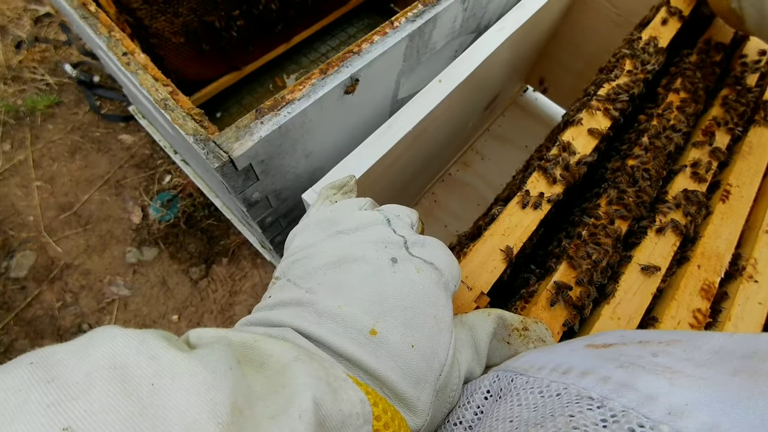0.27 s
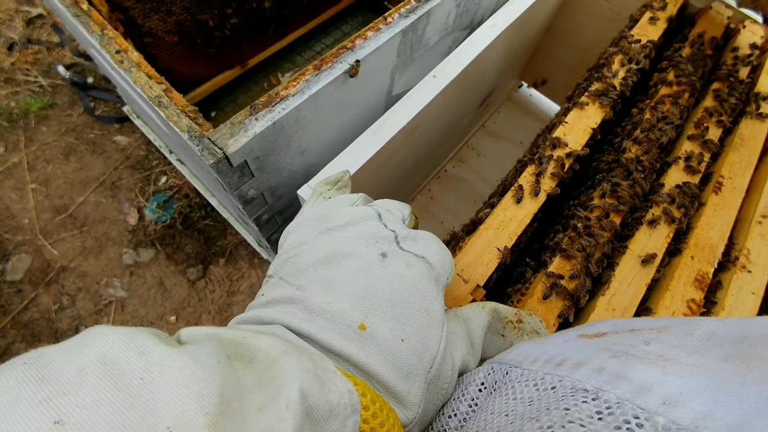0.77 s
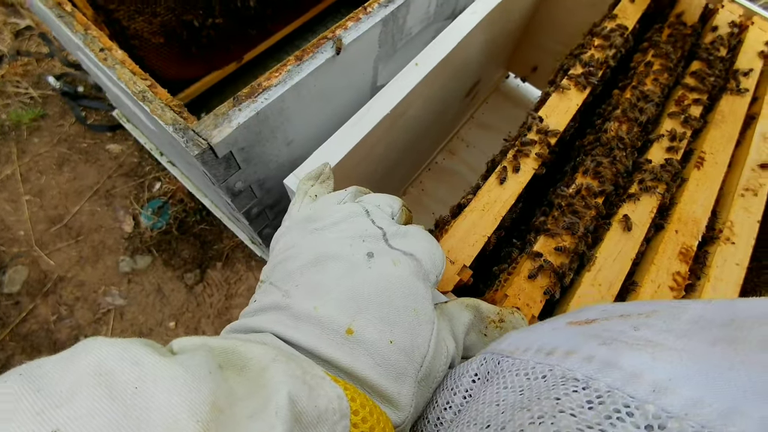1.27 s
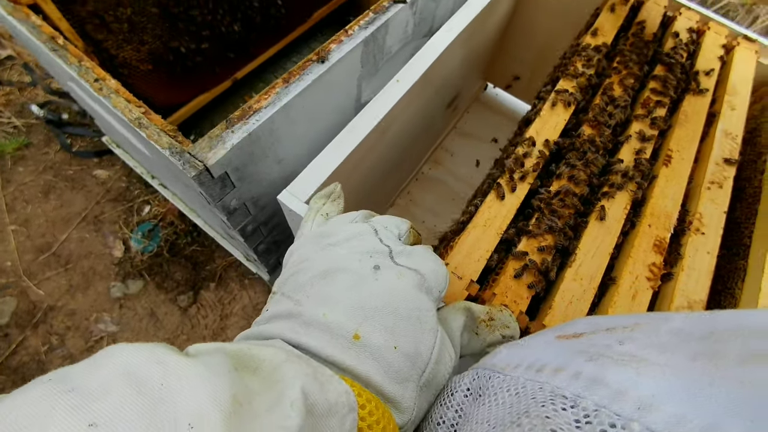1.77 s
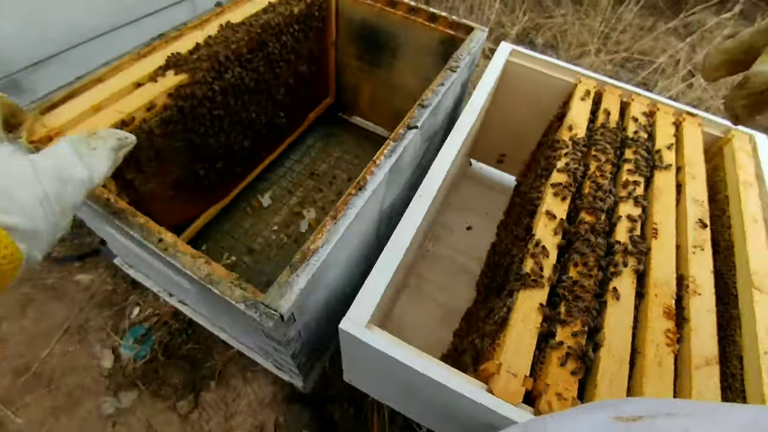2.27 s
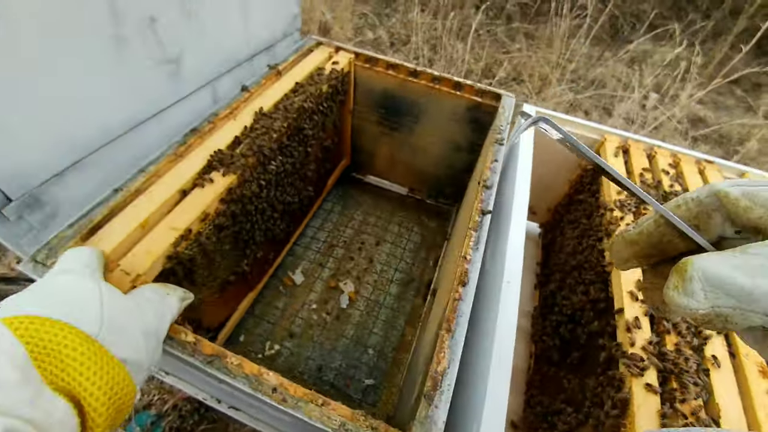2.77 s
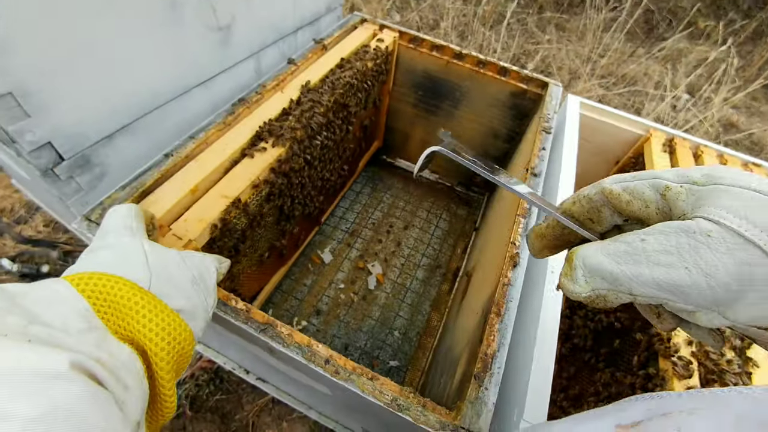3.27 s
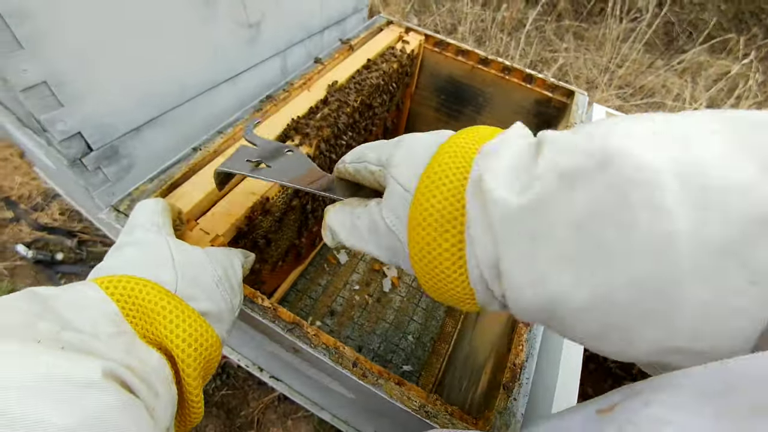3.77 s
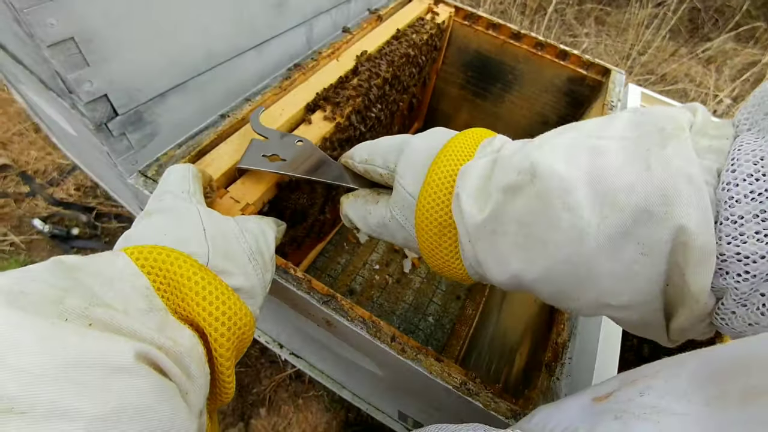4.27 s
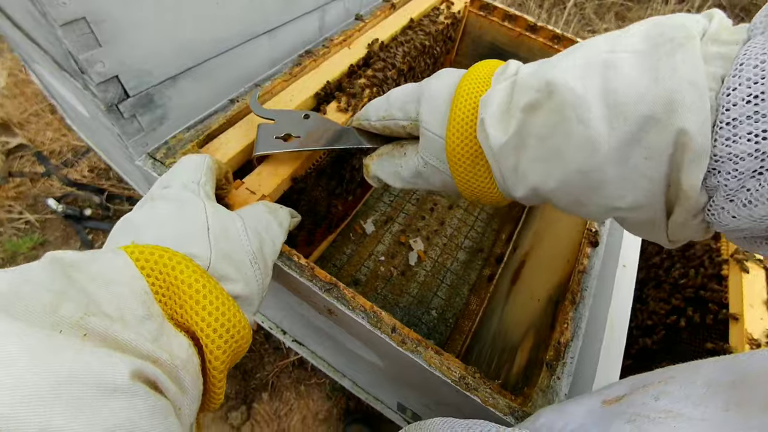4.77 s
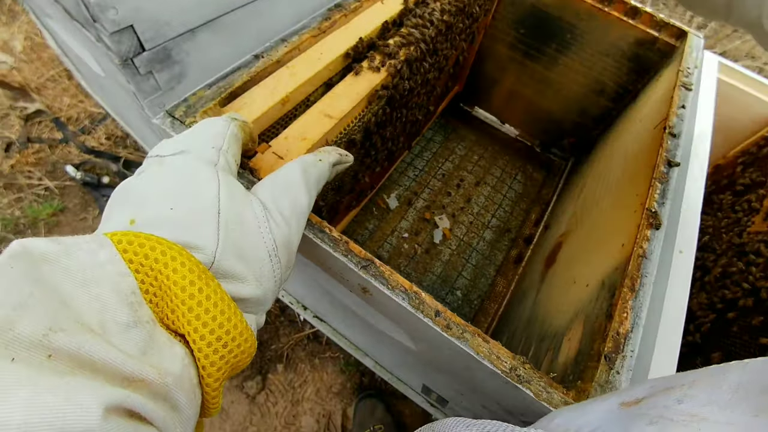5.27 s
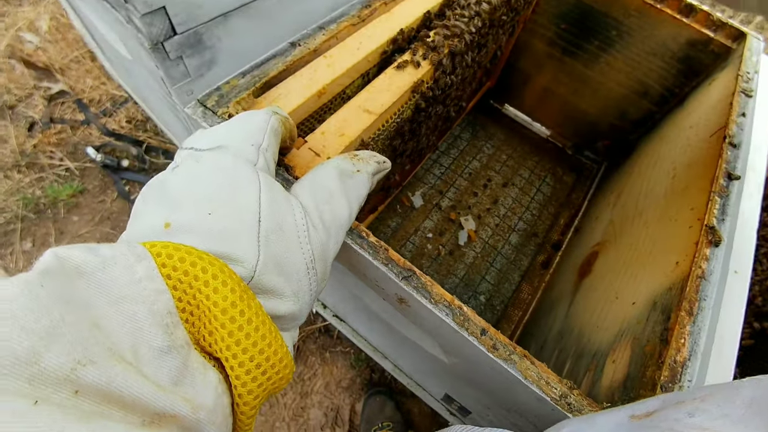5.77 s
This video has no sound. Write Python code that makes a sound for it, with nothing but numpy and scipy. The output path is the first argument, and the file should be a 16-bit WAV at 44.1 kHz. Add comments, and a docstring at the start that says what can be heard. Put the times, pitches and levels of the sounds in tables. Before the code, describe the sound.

Bees hum steadily over an open hive throughout, with light wind rumbling on a close microphone. At 0.7 seconds one hollow wooden box bangs on another, by far the loudest sound, briefly distorting. The hum swells and rises slightly in pitch from 1 to 2 seconds, then eases. Wood gives short, low judders around 1.6 seconds. Small waxy crackles and faint rustles of sleeves and gloves come and go, with a cloth swish near 3.7 seconds. From about 2.9 to 3.3 seconds one bee swings close twice, among soft thuds and light clacks on the hive. Wooden frames knock and creak lightly between 4.1 and 4.4 seconds. A steel tool scrapes very briefly at 4.6 seconds, followed by a sharp wooden knock at 4.7 and a few smaller ones. Near the end, single bees fly past, with one more short creak around 5.9 seconds.

```python
"""Bees hum over an open hive while light air rumbles on the microphone. At 0.7 s one wooden box bangs
on another and overloads the input; the hum swells. Wood judders as it is pushed, wax crackles, and the
beekeeper's sleeves and gloves rustle. Around 3 s one bee weaves close, among soft thuds on the hive.
A steel tool bites into a frame, a sharp knock follows at 4.7 s, and a few last bees fly past."""
import sys
import numpy as np
from scipy import signal
from scipy.fft import rfft, irfft, next_fast_len
from scipy.io import wavfile
from scipy.ndimage import uniform_filter1d, map_coordinates

SR = 44100
rng = np.random.default_rng(int(sys.argv[2]) if len(sys.argv) > 2 else 0)


def master(y):
    """Save y as 16-bit WAV."""
    cut = np.clip(np.atleast_2d(y).T, -1, 1)
    pcm = np.round(cut * 32767)  # scale
    wavfile.write(sys.argv[1], SR, pcm.astype(np.int16))


N = 265217
TIME = np.arange(N) / SR


def amp(db):
    """Decibels to gain."""
    return 10 ** (np.asarray(db) / 20)


def unit(x):
    """Scale to rms 1."""
    return x / np.sqrt(np.mean(x ** 2) + 1e-20)


def curves(rows):
    """Automation lanes: one value per sample for each column after the time."""
    times, *columns = np.transpose(rows)
    return [np.interp(TIME, times, column) for column in columns]


def wobble(rate):
    """Smooth random modulation, rate knots a second."""
    knots = rng.standard_normal(int(N * rate / SR) + 4)
    coarse = np.arange(0, N + 64, 64)
    return np.interp(np.arange(N), coarse, map_coordinates(knots, [coarse * rate / SR]))


def filtered(x, response):
    """Filter x by a complex response of frequency."""
    size = next_fast_len(len(x) + SR // 4)
    return irfft(rfft(x, size) * response(np.fft.rfftfreq(size, 1 / SR)), size)[:len(x)]


def coloured(x, eq):
    """Shape x with an EQ curve and scale it to rms 1."""
    hz, db = np.transpose(eq)
    return unit(filtered(x, lambda f: amp(np.interp(np.log(f + 1), np.log(hz), db))))


def noise(eq):
    """Noise through an EQ curve, at rms 1."""
    return coloured(rng.standard_normal(N), eq)


def add(track, s, sound):
    """Mix a sound into the track at time s."""
    part = track[round(s * SR):][:len(sound)]
    part += sound[:len(part)]


# Fader ride of the air on the microphone: (time [s], level [dB])
AIR_LEVEL = [(0, -53), (.45, -62.5), (.9, -53), (1.4, -59.5), (2.15, -55.5), (3.4, -52), (3.65, -59),
             (4.0, -57), (4.9, -55.5), (5.4, -66), (6.01, -57)]
# EQ of the deep buffeting, the low wash and the hiss: (frequency [Hz], gain [dB])
BUFFET_EQ = [(12, -15.5), (30, -6.5), (62, -2), (90, -16), (200, -38.5), (600, -80.5)]
WASH_EQ = [(40, -29), (100, -13), (150, -7), (250, -7), (600, -9.5), (2000, -55)]
HISS_EQ = [(100, 9.5), (1000, 1.5), (2500, -36.5), (4500, -8.5), (6500, -24.5), (9000, -30.5),
           (12000, -43.5), (15500, -53.5)]

def outdoors(wash_db=-53.5, gust_db=2, hiss_db=-64.5):
    """Light air buffets the microphone over a low outdoor wash and a faint, even hiss."""
    air_db, = curves(AIR_LEVEL)
    buffet = amp(air_db + gust_db * wobble(18)) * noise(BUFFET_EQ)
    wash = amp(wash_db + gust_db * wobble(12)) * noise(WASH_EQ)
    return buffet + wash + amp(hiss_db) * noise(HISS_EQ)


def wingbeats(pitch_hz, gain):
    """One pressure pulse per wing stroke, shared between two samples, with the DC removed."""
    cycles = rng.random() + np.cumsum(pitch_hz) / SR
    position = np.interp(np.arange(1, int(cycles[-1])), cycles, np.arange(N))
    i = position.astype(int)
    early = np.bincount(i, gain[i] * (1 - position + i), N + 1)
    late = np.bincount(i + 1, gain[i] * (position - i), N + 1)
    pulses = (early + late)[:N]
    return pulses - pulses.mean()


# Swell of the colony, driving both hum and buzz: (time [s], level [dB])
SWARM_SWELL = [(0.0, -51.5), (0.45, -51.5), (0.85, -49.5), (1.15, -46), (1.45, -48), (1.9, -47.5),
               (2.2, -52), (3.3, -54.5), (4.45, -57), (5.0, -54.5), (6.01, -55)]
# Tone of massed wings: (frequency [Hz], gain [dB])
SWARM_EQ = [(120, -26), (190, -7.5), (260, -15.5), (330, 1), (420, -1), (520, -6), (680, -9.5), (950, -1.5),
            (1400, -13), (2000, -19.5), (3000, -30.5), (4200, -29.5), (6000, -44.5), (9000, -44.5),
            (14000, -81)]

def swarm(count=38, calm_hz=194.9, roused_hz=208.9, rousing_s=1.6, spread=.089, crossover_hz=600):
    """A bed of bees, each wandering in pitch and distance; wings speed up as the colony is disturbed."""
    centre_hz = np.interp(TIME, [0, rousing_s], [calm_hz, roused_hz])
    pulses = np.zeros(N)
    for rank in np.linspace(-1, 1, count):  # from slow fanners to fast fliers
        detune = spread * np.sinh(2 * rank) / 2
        drift, flutter = .04 * wobble(3.8), .016 * wobble(30)
        nearness = amp(3 * wobble(4.014))
        pulses += wingbeats(centre_hz * np.exp(detune + drift + flutter), nearness)
    wings = coloured(pulses, SWARM_EQ)
    hum = filtered(wings, lambda f: 1 / (1 + (f / crossover_hz) ** 6))
    swell_db, = curves(SWARM_SWELL)
    hum_db = swell_db + 2
    buzz_db = -53.5 + .44 * (swell_db + 52.5)  # the upper buzz swells less than the hum inside the box
    return amp(hum_db) * unit(hum) + amp(buzz_db) * unit(wings - hum)


# Fly-bys at their nearest: (time [s], level [dB], wingbeat [Hz], half length [s])
FLYBYS = [(0.14, -49, 224, .1), (2.66, -54, 227, .04), (4.007, -51.5, 215, .06), (5.4, -53.5, 222.9, .08),
          (5.894, -50, 229.3, .07), (5.984, -43.5, 219, 0.046)]
# Tone of a passing bee: (frequency [Hz], gain [dB])
FLYBY_EQ = [(100, -12), (215, 6), (430, 3), (650, -12), (870, -7), (1300, -19.5), (2000, -29.5),
            (4000, -47), (9000, -53), (14000, -76)]

def passing_bees(flutter=.01, doppler=.01):
    """Single bees swell out of the swarm and drop a little in pitch as they fly past."""
    out = np.zeros(N)
    for s, db, hz, half_s in FLYBYS:
        along = (TIME - s) / half_s
        distance = np.hypot(1, along)  # in units of the closest approach
        pitch_hz = hz * (1 - doppler * along / distance + flutter * wobble(35))
        out += amp(db) / distance ** 2 * coloured(wingbeats(pitch_hz, np.ones(N)), FLYBY_EQ)
    return out


# Thin, bright tone of the gloves: (frequency [Hz], gain [dB])
GLOVE_EQ = [(2000, -25), (5000, -3.5), (7000, -0.5), (9000, -0.5), (10500, -20), (15000, -42)]

def gloves(db=-84, fibre_db=3):
    """Leather flexes with a faint, restless crinkle."""
    flexing = amp(2.5 * wobble(9) + 2 * wobble(60))
    catches = rng.standard_normal(N) * amp(fibre_db * wobble(1000))
    return amp(db) * coloured(flexing * catches, GLOVE_EQ)


# Arm moves at their fastest: (time [s], level [dB], half length [s])
ARM_MOVES = [(1.148, -70.5, 0.17), (2.035, -61, 0.1), (2.479, -60, 0.7), (3.71, -53.5, 0.14),
             (4.94, -63, 0.19), (5.446, -61, 0.1)]
# Tone of rubbing cloth: (frequency [Hz], gain [dB])
SLEEVE_EQ = [(300, -7), (1200, 7), (2000, 0), (3000, -11), (4600, -11.5), (6000, -26), (9000, -40.5),
             (14000, -51.5)]

def sleeves(rest_db=-71, fibre_db=3, crinkle_db=1):
    """Stiff cloth swishes in tiny catches, swelling and fading with each move of an arm."""
    swishes = sum(amp(db) * np.exp(-((TIME - s) / half_s) ** 2) for s, db, half_s in ARM_MOVES)
    catches = rng.standard_normal(N) * amp(fibre_db * wobble(900))
    crinkle = amp(crinkle_db * wobble(70))
    return (amp(rest_db) + swishes) * crinkle * coloured(catches, SLEEVE_EQ)


# Small crackles, and at 0.884 s a faint, thin high chirp just after the bang:
# (time [s], peak [dB], resonance [Hz], 60 dB decay [s])
GRITTY_BURSTS = [(0.256, -52, 7500, .04), (0.298, -57, 8200, .03), (0.659, -40, 1470, 0.052),
                 (0.671, -38, 1900, 0.03), (0.6715, -45, 4200, .015), (0.884, -54, 7000, .08),
                 (1.455, -55, 7000, .05), (1.62, -51, 3800, 0.15), (1.9905, -51, 3900, 0.016),
                 (2.02, -45.5, 4100, 0.072), (2.039, -41, 3700, 0.021), (2.093, -53.5, 7700, .03),
                 (2.116, -36, 1990, 0.021), (2.498, -46, 2300, 0.022), (2.688, -57, 7000, .03),
                 (2.7157, -40, 2300, 0.015), (3.207, -42, 2000, 0.025), (3.448, -42, 2600, .022),
                 (3.612, -55, 7000, .015), (3.642, -47, 2400, .025), (3.785, -47, 2600, .025),
                 (4.7, -46, 8600, 0.039), (5.007, -48, 2600, .015), (5.144, -42, 4300, 0.0065),
                 (5.242, -46, 3900, 0.02), (5.2993, -47, 3940, 0.016)]

def crackles(q=3, grit=.86):
    """Short gritty bursts, most from wax and leather sticking and letting go; lower ones are duller."""
    out, t = np.zeros(N), np.arange(SR // 5) / SR
    for s, db, hz, t60 in GRITTY_BURSTS:
        grains = rng.standard_normal(len(t)) * np.exp(grit * rng.standard_normal(len(t)))
        cutoff_hz = min(9500, 1.3 * hz)

        def tone(f):
            resonance = 1j * f * hz / (hz * hz - f * f + 1j * f * hz / q)
            return resonance / (1 + (f / cutoff_hz) ** 6)

        burst = filtered(grains * amp(-60 * t / t60), tone)
        add(out, s, amp(db) * burst / np.abs(burst).max())
    return out


# Tone of the singing blade and of the wood under it: (frequency [Hz], gain [dB])
BLADE_EQ = [(1500, -25), (3300, -3), (3850, 10), (4300, 5), (4800, -12), (6200, -29), (8400, -9),
            (10500, -43.5), (15000, -40)]
RASP_EQ = [(1500, -1), (2800, 7), (3500, -7), (4700, 1), (6200, -24), (8800, -13), (10500, -35),
           (15000, -40)]

def tool_scrape(bite_s=4.579, sing_db=-50, rasp_db=-45.5, crossfade_s=.027, chatter_db=2):
    """The steel blade sings as it bites into a frame, then rasps over the wood."""
    t = TIME - bite_s
    stroke = np.interp(t, [-.005, 0, .028, .04], [0, 1, 1, 0])  # attack, hold, release
    caught = np.exp(-(np.maximum(t, 0) / crossfade_s) ** 2)
    sing = amp(sing_db) * caught * noise(BLADE_EQ)
    rasp = amp(rasp_db) * (1 - caught) * noise(RASP_EQ)
    return stroke * amp(chatter_db * wobble(230)) * (sing + rasp)


# Short pushes: (time [s], level [dB], slip rate [Hz], half length [s], second harmonic gain [dB])
PUSHES = [(0.677, -38.5, 252, 0.019, -8), (1.593, -23, 162, 0.016, -15), (1.663, -25, 176.6, 0.014, -3.5),
          (1.677, -20, 172.4, 0.013, -8), (2.725, -35, 139, 0.0053, -13), (3.027, -41.5, 125, 0.033, -20),
          (3.361, -29.5, 124, 0.0048, -22), (4.107, -28.5, 173, 0.0049, -8), (4.11, -33, 243, 0.016, -29),
          (4.278, -35.5, 251, 0.023, -32), (4.356, -35, 257, 0.015, -22), (4.386, -34.5, 199, 0.0042, -20),
          (4.958, -40.5, 128, 0.017, -22), (5.874, -27.5, 140.8, 0.012, -24),
          (5.98, -33, 239, 0.0051, -23.5)]

def judders(sag=.068, roughness=.37):
    """Wood sticks and slips on wood for a few uneven cycles, slowing as the push ends."""
    out, t = np.zeros(N), np.arange(-SR // 20, SR // 20) / SR
    for s, db, hz, half_s, overtone_db in PUSHES:
        phase = 2 * np.pi * hz * (t - sag * t * t / (2 * half_s))
        wave = sum(amp(overtone_db * k * k) * np.sin((k + 1) * phase) for k in range(4))
        grip = 1 + roughness * wobble(257.4)[:len(t)]
        swell = np.exp(-(t / half_s) ** 2)
        add(out, s + t[0], amp(db) * swell * grip * wave)
    return out


# Flight of the close-up bee: (time [s], level [dB], wingbeat [Hz])
CLOSE_FLIGHT = [(2.8, -69, 205), (2.89, -56, 203.5), (2.935, -54, 206.7), (2.955, -40, 209.3),
                (2.985, -38, 217.4), (3.015, -47, 212), (3.05, -43, 204.3), (3.075, -47, 201.4),
                (3.11, -44, 210), (3.143, -34.5, 215.7), (3.175, -44, 219.2), (3.21, -43, 217.7),
                (3.27, -49, 211), (3.35, -69, 207.8)]
# Its brighter buzz: (frequency [Hz], gain [dB])
CLOSE_EQ = [(100, -18), (215, 8), (430, 4.5), (650, -8), (870, -9), (1300, -15.5), (2000, -24), (4000, -35),
            (7500, -39), (14000, -72)]

def close_bee(flutter=.006, waver_db=1.7):
    """One bee swings up to the microphone twice, beating faster as it comes."""
    db, hz = curves(CLOSE_FLIGHT)
    present = (TIME > CLOSE_FLIGHT[0][0]) & (TIME < CLOSE_FLIGHT[-1][0])
    pulses = wingbeats(hz * (1 + flutter * wobble(35)), amp(waver_db * wobble(90)))
    return present * amp(db) * coloured(pulses, CLOSE_EQ)


def struck_wood(hits, modes, crack_db, crack_t60, vary_db, cutoff_hz):
    """Each hit is a noisy crack plus ringing modes; softer contact wakes fewer of the high ones."""
    out, t = np.zeros(N), np.arange(SR // 2) / SR
    hz, mode_db, t60 = np.transpose(modes)[:, :, None]
    polarity = (-1) ** np.arange(len(modes))[:, None]
    for s, db, bright_hz in hits:
        decays = amp(mode_db + vary_db * rng.standard_normal(hz.shape) - 60 * t / t60)
        ring = (polarity * decays * np.sin(2 * np.pi * hz * t)).sum(0)
        crack = amp(crack_db - 60 * t / crack_t60) * rng.standard_normal(len(t))

        def tone(f):
            contact = 1 / (1 + 1j * f / bright_hz) ** 2
            return contact / (1 + (f / cutoff_hz) ** 8)

        hit = filtered(ring + crack, tone)
        add(out, s, amp(db) * hit / np.abs(hit).max())
    return out


# Ring of a frame hanging in the hive: (frequency [Hz], gain [dB], 60 dB decay [s])
FRAME_MODES = [(62, -10.5, 0.21), (134.5, 2.6, 0.11), (214.6, 4.5, 0.12), (264, 3, 0.082), (345, 2, 0.069),
               (455, -1.5, 0.062), (538, 2.5, 0.043), (781, 7, 0.037), (1120, 4, 0.065),
               (1332, -4.5, 0.064), (1497, 5, 0.044), (2280, -15, 0.037), (3250, -10, 0.022),
               (4590, -6.5, .028)]
# Knocks on the frames: (time [s], peak [dB], contact brightness [Hz])
FRAME_HITS = [(1.488, -39.5, 1797), (2.69, -36.5, 2000), (2.7168, -39, 1500), (3.348, -33.5, 900),
              (3.447, -38, 2004), (4.0952, -39, 397), (4.252, -35.5, 800), (4.27, -32.5, 1200),
              (4.341, -32.5, 1310), (4.367, -34, 1100), (4.657, -32, 2600), (4.6985, -16.5, 2610),
              (4.7009, -12, 2210), (4.7089, -26.5, 221), (4.792, -25, 1520), (4.805, -28, 1500),
              (4.821, -35.5, 1400)]
# Soft nudges to the hive: (time [s], peak [dB])
HIVE_NUDGES = [(2.729, -41), (2.844, -38.5), (2.999, -36), (3.37, -33), (4.83, -31)]

def frame_knocks(glove_brightness_hz=75):
    """Frames clack as they are loosened and thud when a gloved hand nudges the hive."""
    thuds = [(s, db, glove_brightness_hz) for s, db in HIVE_NUDGES]
    hits = FRAME_HITS + thuds
    return struck_wood(hits, FRAME_MODES, crack_db=7, crack_t60=.05, vary_db=1.5, cutoff_hz=5240)


# Body of the hive box: (frequency [Hz], gain [dB], 60 dB decay [s])
BOX_MODES = [(127, -16.6, .148), (168.3, -.2, .08), (185.3, -20, .366), (237, -13, .092),
             (303.8, -.3, .052), (343.8, -8.3, .158), (390.7, -6.2, .099), (477, -21.8, .093),
             (566.6, -15.2, .09), (670, -20, .061), (803, -13.6, .061), (1125, -21, .05),
             (1216, -14.4, .08), (1598, -23.3, .048), (2560, -30, .03)]
# The bang and its bounces: (time [s], peak before overload [dB], contact brightness [Hz])
BOX_HITS = [(0.70728, -2.5, 3100), (0.70847, 6.8, 1030), (0.71021, -0.5, 960), (0.72089, -4, 410),
            (0.72551, -6.6, 1740)]

def box_bang():
    """One hollow wooden box bangs on the other and bounces."""
    return struck_wood(BOX_HITS, BOX_MODES, crack_db=-16, crack_t60=.047, vary_db=.2, cutoff_hz=13990)


def scene():
    """Woodwork, handling, bees and open air at one microphone."""
    wood = box_bang() + frame_knocks() + judders()
    textures = crackles() + tool_scrape() + sleeves() + gloves()
    bees = swarm() + passing_bees() + close_bee()
    return (outdoors() + bees + textures + wood)[None]


CEILING = .84  # amplitude at which the input overloads

def overload(x, squeal_db=-10, high_hz=13000, low_hz=6000, jitter=.16, full_excess=.31):
    """The input flattens peaks and squeals in a rising chirp as it recovers from each deep one."""
    clipped = x / (1 + np.abs(x / CEILING) ** 12) ** (1 / 12)
    excess = np.maximum(np.abs(x) / CEILING - 1, 0)
    falling = np.gradient(uniform_filter1d(excess, size=15)) < -1e-6
    recovering = uniform_filter1d(1. * falling, size=11)
    depth = np.clip(uniform_filter1d(excess, size=45) / full_excess, 0, 1) ** 1.5
    scatter = 1 + jitter * unit(uniform_filter1d(rng.standard_normal(N), size=5))
    pitch_hz = scatter * (low_hz + (high_hz - low_hz) * np.exp(-excess / full_excess))
    squeal = np.sin(2 * np.pi * np.cumsum(pitch_hz) / SR)
    blend = amp(squeal_db) * recovering * depth
    return (1 - blend) * clipped + blend * squeal


def level_dip(x, depth_db=2, sink_s=.056, return_s=.08):
    """The sound dips slightly just after the bang, then swells back."""
    peaks = 1. * (np.abs(x) > CEILING)
    t = np.arange(SR) / SR
    envelope = (1 - np.exp(-(t / sink_s) ** 2)) * np.exp(-t / return_s)
    dip = signal.fftconvolve(peaks, envelope)[:N]
    return amp(-depth_db * dip / (dip.max() + 1e-9))


def record(dry):
    """Overload, a slight dip after the bang, then a high cut that closes at 16630 Hz."""
    dipped = overload(dry[0]) * level_dip(dry[0])
    return filtered(dipped, lambda f: np.clip((16630 - f) / 1500, 0, 1) ** 2)[None]


dry = scene()
out = record(dry)
master(out)
```